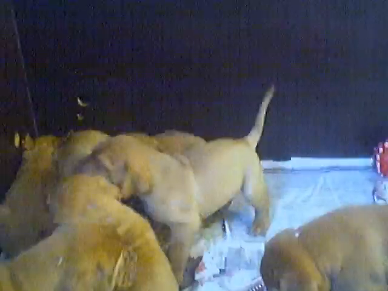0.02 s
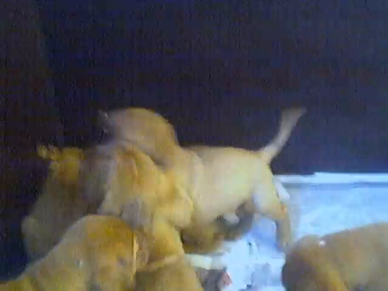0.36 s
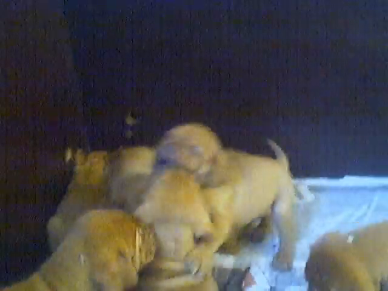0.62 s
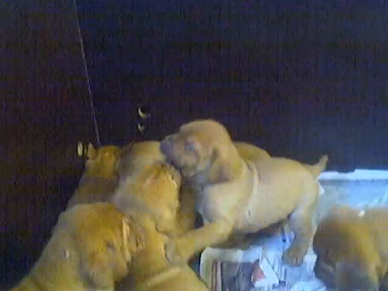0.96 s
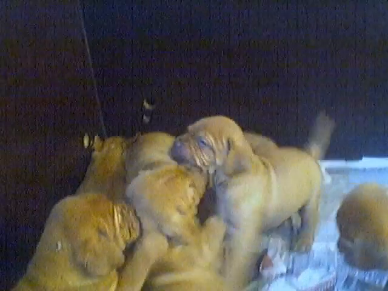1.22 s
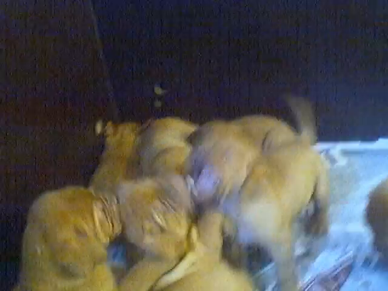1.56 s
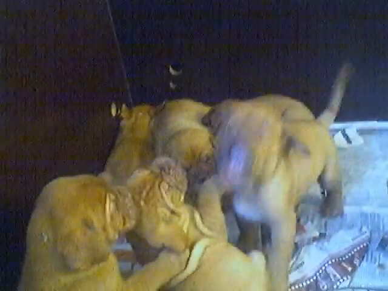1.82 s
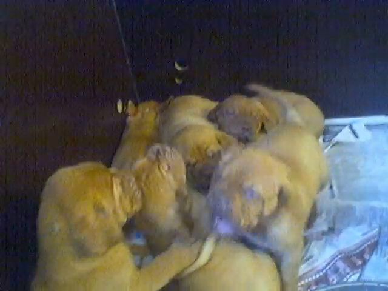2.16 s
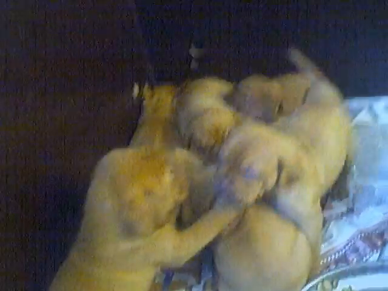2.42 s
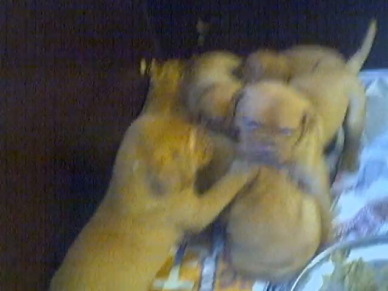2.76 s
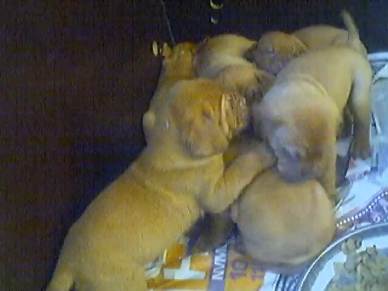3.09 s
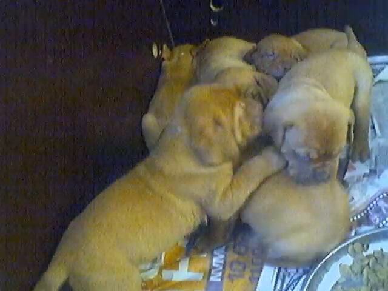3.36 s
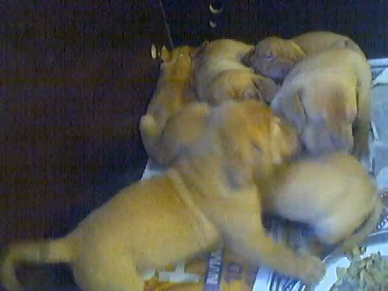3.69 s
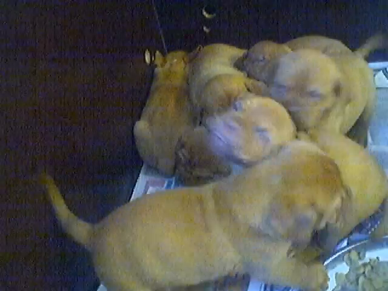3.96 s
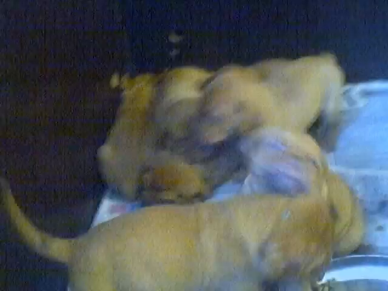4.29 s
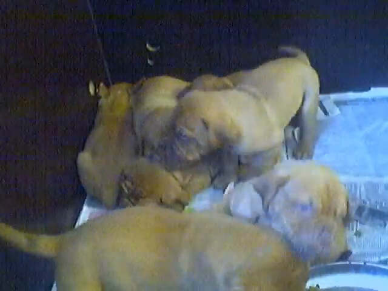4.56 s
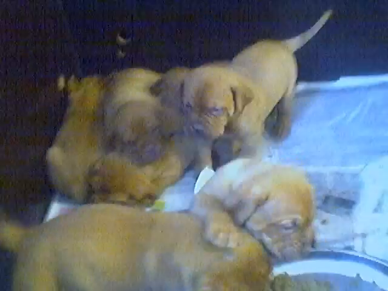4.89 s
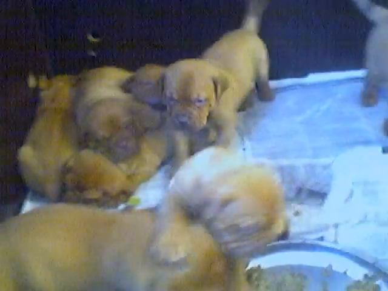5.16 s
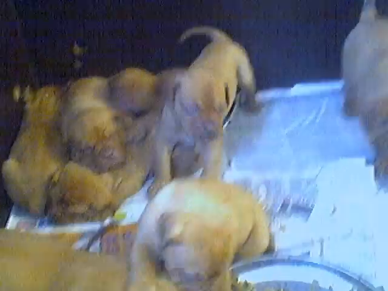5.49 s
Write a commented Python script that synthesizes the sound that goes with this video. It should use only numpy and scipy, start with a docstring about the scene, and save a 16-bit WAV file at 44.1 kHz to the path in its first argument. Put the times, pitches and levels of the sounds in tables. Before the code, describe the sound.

Puppies scuffle on faintly rustling newspaper and clink a metal pan, then one tumbles close by with loud thumps and scraping, over buzzy hum.

```python
"""Newspaper rustles and snaps under the paws of puppies scuffling indoors beside a metal food pan. Claws tick,
kibble cracks sharply between teeth and rings briefly, a paw makes the pan clink, and there are faint grunts. At
the end a pup tumbles close by, thumps the floor and shoves the pan over the paper. A cheap camera picks it all
up with a shrill microphone, mains hum and a coarse, buzzy converter."""
import sys
import numpy as np
from scipy import signal
from scipy.fft import rfft, irfft, next_fast_len
from scipy.io import wavfile

SR = 44100
rng = np.random.default_rng(int(sys.argv[2]) if len(sys.argv) > 2 else 0)


def output_pcm(signal):
    """Save a mono or channel-first signal as 16-bit PCM at the path in sys.argv[1].

    Samples are clipped to [-1, 1] before scaling.
    """
    pcm = np.clip(np.atleast_2d(signal).T, -1, 1) * 32767
    wavfile.write(sys.argv[1], SR, np.round(pcm).astype(np.int16))


N = 247401
TIME = np.arange(N) / SR


def from_db(db):
    """Turn decibels into a number to multiply by."""
    return 10 ** (np.asarray(db) / 20)


def unit_power(x):
    """Scale a signal so that its average power is 1."""
    return x / np.sqrt(np.mean(x ** 2) + 1e-20)


def drift(per_s):
    """A wandering curve that heads for a new random value per_s times a second."""
    points = rng.standard_normal(4000)
    return unit_power(np.interp(TIME * per_s, np.arange(len(points)), points))


def coloured(x, spectrum):
    """Make some pitches louder and others softer, following rows of (Hz, dB)."""
    size = next_fast_len(N + SR // 4, True) // 2 * 2
    hz, db = np.transpose(spectrum)
    grid_hz = np.maximum(np.arange(size // 2 + 1) * SR / size, 1)
    gain = from_db(np.interp(np.log(grid_hz), np.log(hz), db))
    # Minimum phase: the filter rings only after a click, never before it.
    cepstrum = irfft(np.log(gain))
    cepstrum[1:size // 2] *= 2
    cepstrum[size // 2 + 1:] = 0
    return irfft(rfft(x, size) * np.exp(rfft(cepstrum)))[:N]


def resonance(x, hz, width):
    """Let through a band of pitches around hz, with the width also in Hz."""
    r = np.exp(-np.pi * width / SR)
    feedback = [1, -2 * r * np.cos(2 * np.pi * hz / SR), r * r]
    return signal.lfilter(np.array([1, 0, -1]) * (1 - r * r) / 2, feedback, x + 1e-18)


def ring(x, hz, t60):
    """Each click starts a pure tone that fades by 60 dB in t60 seconds."""
    r, w = np.exp(-np.log(1000) / (t60 * SR)), 2 * np.pi * hz / SR
    return signal.lfilter([0, np.sin(w)], [1, -2 * r * np.cos(w), r * r], x + 1e-18)


def grains(per_s, spread_db):
    """Tiny clicks of uneven size at random moments."""
    sizes = from_db(spread_db * np.minimum(rng.exponential(1, N), 4))
    signs = rng.choice([-1, 1], N)
    return unit_power(sizes * signs * (rng.random(N) < per_s / SR))


def sprays(rows, spray_db, fade_s):
    """Each row (start, dB) makes a click, then a fading spray with spray_db more energy than it."""
    out, age = np.zeros(N + SR), TIME[:SR // 8]
    for start, db in rows:
        spray = rng.standard_normal(len(age)) * np.exp(-age / fade_s) * (age > .001)
        spray *= from_db(spray_db) / np.linalg.norm(spray)
        spray[0] += 1   # the click itself
        at = round(start * SR)
        out[at:at + len(age)] += from_db(db) * spray
    return out[:N]


def strokes(rows, rise_s, sag_db_per_s, fade_db_per_s):
    """A loudness curve: each stroke (start, length, dB) rises, sags while it lasts, then fades."""
    power = np.zeros(N)
    for start, length, db in rows:
        age = np.maximum(TIME - start, 0)
        rise = np.minimum(age / rise_s, 1)
        fall_db = sag_db_per_s * np.minimum(age, length) + fade_db_per_s * np.maximum(age - length, 0)
        power += (rise * from_db(db - np.minimum(fall_db, 200))) ** 2
    return np.sqrt(power)


# The tones of the hum. Each row: multiple of the mains frequency, level in dB.
HUM_TONES = [(1, -51), (3, -71.5), (4, -79)]

def electronics(mains_hz=50):
    """The camera adds mains hum, a low flutter of noise and a faint sputtering hiss."""
    phase = 2 * np.pi * mains_hz * (TIME + .001)
    hum = -sum((-1) ** k * from_db(db) * np.sin(multiple * phase)
               for k, (multiple, db) in enumerate(HUM_TONES))
    flutter = from_db(-71) * unit_power(resonance(rng.standard_normal(N), hz=242.6, width=400))
    hiss = from_db(-71.5) * rng.standard_normal(N)
    sputter = from_db(-64) * grains(per_s=140, spread_db=-1)
    return hum + flutter + hiss + sputter


# Faint puppy grunts. Each row: loudest moment in seconds, length in seconds, pitch in Hz, level in dB.
PUPPY_GRUNTS = [(4.69, 0.063, 616, -53), (4.89, 0.14, 474, -59.5), (4.965, 0.08, 616, -60.5)]

def grunts():
    """A hoarse little sound swells and fades, resonating in a closed muzzle."""
    out = np.zeros(N)
    for middle, length, hz, db in PUPPY_GRUNTS:
        swell = np.cos(np.pi * np.clip((TIME - middle) / length, -.5, .5))
        rasp = resonance(grains(per_s=2300, spread_db=3), hz, width=100)
        out += from_db(db) * swell * unit_power(rasp)
    return out


# Claws and kibble tapping. Each row: start in seconds, level in dB.
HARD_TAPS = [(0.0034, -36.5), (0.07, -36.5), (0.0796, -32.5), (0.158, -34.5), (1.508, -39), (2.204, -36.5),
             (2.864, -35.5), (3.0089, -37.5), (3.1758, -38.5), (3.502, -40.5), (3.8601, -26.5),
             (3.917, -36), (3.9504, -26.5), (3.962, -29), (4.1063, -36.5), (5.165, -21), (5.179, -26),
             (5.2526, -25)]

def ticks():
    """Small hard things touch and ring for a few thousandths of a second."""
    taps = sprays(HARD_TAPS, spray_db=-10, fade_s=0.004)
    return from_db(-6.5) * ring(taps, hz=2676, t60=0.0067)


# Kibble cracking between teeth. Each row: start in seconds, pitch in Hz, level in dB.
KIBBLE_CRUNCHES = [(0.0147, 3870, -42), (1.497, 3540, -36), (2.162, 1293, -41), (3.878, 4600, -41.5),
                   (4.173, 5060, -35.5), (4.697, 1460, -36), (5.186, 3800, -30)]

def kibble_crunches():
    """Each crunch of kibble is a quick spray of clicks that rings briefly at its own pitch."""
    return sum(ring(sprays([(start, db)], spray_db=0, fade_s=0.0029), hz, t60=0.0047)
               for start, hz, db in KIBBLE_CRUNCHES)


# The resonances of the floor under the paper. Each row: pitch in Hz, width in Hz, level in dB.
FLOOR_TONES = [(101.5, 23, -9), (160.4, 34, -0.5), (348, 40, 2.5), (581.3, 31, 2.5), (915, 55, 4),
               (1171, 46, -0.5), (1656, 51, -2.5)]

def floor_body(push):
    """A push shakes the floor at several pitches that die away quickly."""
    return sum((-1) ** k * from_db(db) * resonance(push, hz, width)
               for k, (hz, width, db) in enumerate(FLOOR_TONES))


# Paws and bodies landing. Each row: start in seconds, level in dB.
LANDINGS = [(2.349, -45), (3.776, -35), (4.171, -30.5), (4.214, -34.5), (4.266, -28.5), (5.093, -42),
            (5.251, -19), (5.357, -10), (5.514, -10.5)]

def thumps():
    """Soft weights land and make the floor thud."""
    return from_db(17.5) * floor_body(sprays(LANDINGS, spray_db=2, fade_s=0.012))


# The tones of the metal pan. Each row: pitch in Hz, level in dB, seconds to fade by 60 dB.
PAN_TONES = [(2000, -6.5, .08), (2136, -5, .15), (2165, 0.5, 0.22), (2248, -5, 0.14), (2662, -14.5, 0.2),
             (2756, -10.5, .17), (3314, -14, 0.2)]

def pan_body(push):
    """The pan rings at pitches so close together that the sound wavers."""
    return sum(from_db(db) * ring(push, hz, t60) for hz, db, t60 in PAN_TONES)


# Paws knocking the pan. Each row: start in seconds, level in dB.
PAN_KNOCKS = [(2.0143, -33.5), (2.0264, -33.5), (2.0497, -21), (2.0704, -30.5)]

def pan_clinks():
    """A knock rings the pan; the kibble in it jumps and rattles back down."""
    knocks = sprays(PAN_KNOCKS, spray_db=-16, fade_s=0.0027)
    kibble = sprays(PAN_KNOCKS, spray_db=14, fade_s=0.016)
    hollow = resonance(resonance(kibble, hz=2080, width=560), hz=2080, width=560)
    rattle = hollow + from_db(-1.5) * resonance(kibble, hz=1260, width=630)
    sparkle = resonance(kibble, hz=8800, width=2300)
    return from_db(-19) * pan_body(knocks) + from_db(2.6) * rattle + from_db(-5.5) * sparkle


# The faint rustle of restless puppies between paw strokes. Each row: time in seconds, level in dB.
FIDGETING = [(0, -58.5), (0.25, -63), (0.52, -67), (0.65, -59.5), (0.95, -60.5), (1.24, -67.5),
             (1.33, -58.5), (2.25, -56.5), (2.36, -61.5), (2.66, -63.5), (2.9, -52), (3.08, -67.5),
             (3.3, -56), (3.68, -61), (4.05, -52.5), (4.7, -51.5), (5.03, -62)]
# Paws sliding over the paper. Each row: start in seconds, length in seconds, level in dB.
PAW_SLIDES = [(0.0, 0.018, -48.5), (0.064, 0.02, -43), (0.11, 0.04, -54.5), (0.33, 0.025, -54.5),
              (0.765, 0.037, -54.5), (1.03, 0.023, -50.5), (1.18, 0.0052, -55), (1.486, 0.05, -45),
              (1.56, 0.16, -50), (1.68, 0.15, -49), (1.85, 0.075, -57.5), (1.978, .02, -50.5),
              (2.73, 0.072, -54.5), (2.797, 0.019, -45), (2.854, 0.046, -45.5), (3.108, 0.017, -46.5),
              (3.17, 0.055, -50.5), (3.38, 0.19, -52.5), (3.722, .015, -51.5), (3.778, 0.022, -50),
              (3.902, .11, -47), (4.102, 0.019, -47.5), (4.167, 0.034, -46), (4.213, 0.12, -41.5),
              (4.34, 0.13, -48.5), (4.465, 0.044, -43), (4.55, .14, -48), (4.835, 0.051, -54.5)]
# Creases snapping. Each row: start in seconds, level in dB.
CREASE_SNAPS = [(0.0153, -31.5), (1.034, -38), (1.4936, -32.5), (1.526, -33), (2.1624, -30), (2.541, -34),
                (3.2035, -28.5), (4.217, -26), (4.2355, -36), (4.263, -24.5), (4.484, -29.5), (5.095, -35),
                (5.111, -26), (5.2533, -30)]
# The tone colour of rustling paper. Each row: frequency in Hz, boost or cut in dB.
RUSTLE_COLOUR = [(100, -6.5), (300, 1), (700, -2), (1200, 1.5), (1900, 1.5), (3000, -1.5), (3800, -5.5),
                 (5000, -9.5), (6500, -10.5), (9200, -5.5), (11000, -11.5)]

def newspaper():
    """Paper fibres crackle in clumps as paws slide; now and then a crease snaps."""
    fidgets = from_db(np.interp(TIME, *np.transpose(FIDGETING)))
    slides = from_db(0.06) * strokes(PAW_SLIDES, rise_s=0.005, sag_db_per_s=15, fade_db_per_s=420)
    fibres = grains(per_s=8000, spread_db=2)
    clumps = from_db(1.9 * drift(per_s=80) + 0.23)
    crackle = np.hypot(slides, fidgets) * fibres * clumps
    snaps = from_db(9) * sprays(CREASE_SNAPS, spray_db=-2, fade_s=0.005)
    return coloured(crackle + snaps, RUSTLE_COLOUR)


# The tumbling pup shoves pan and paper.
# Each row: start in seconds, length in seconds, scraping level in dB, push on the floor in dB.
PUP_SHOVES = [(5.088, 0.18, -42.5, -42.5), (5.112, 0.12, -34.5, -51), (5.163, 0.023, -34, -60),
              (5.247, 0.035, -30.5, -28), (5.297, 0.052, -25, -26.5), (5.35, 0.048, -23.5, -33.5),
              (5.418, 0.17, -30.5, -34), (5.514, 0.03, -31.5, -40)]
# The tone colour of scraped paper. Each row: frequency in Hz, boost or cut in dB.
SCRAPE_COLOUR = [(80, -11), (200, -1), (600, -2), (1200, 7.5), (2000, 5.5), (3000, -0.5), (4200, -8),
                 (6500, -17), (9200, -7), (11000, -23.5)]

def tumble():
    """The shoved pan sticks and slips: paper scrapes, the metal sings faintly and the floor rumbles."""
    shape = dict(rise_s=0.0061, sag_db_per_s=21, fade_db_per_s=230)
    scraping = strokes([(start, length, db) for start, length, db, _ in PUP_SHOVES], **shape)
    weight = strokes([(start, length, db) for start, length, _, db in PUP_SHOVES], **shape)
    slips = from_db(0.91 * drift(per_s=130))
    friction = scraping * slips * grains(per_s=14000, spread_db=1.7)
    rumble = from_db(13) * floor_body(weight * slips * grains(per_s=4000, spread_db=0.1))
    # The pan's rim catches on the paper; the catches grow louder faster than the scraping does.
    grip = scraping.max() * (scraping / scraping.max()) ** 2.4
    catches = from_db(-22.5) * ring(grip * grains(per_s=130, spread_db=-2.1), hz=2750, t60=0.006)
    singing = from_db(-48.5) * pan_body(friction)
    return coloured(friction, SCRAPE_COLOUR) + catches + singing + rumble


def room(x, t60, echo_db):
    """The walls of the pen add a short blur of echoes."""
    age = TIME[:SR // 2]
    tail = rng.standard_normal(len(age)) * np.exp(-np.log(1000) * age / t60) * (age > .003)
    return x + from_db(echo_db) * signal.fftconvolve(x, tail / np.linalg.norm(tail))[:N]


def scene():
    """All the sounds in the pen, mixed into one channel."""
    mix = newspaper() + ticks() + kibble_crunches() + tumble() + thumps() + pan_clinks() + grunts()
    return room(mix, t60=0.24, echo_db=-12.5)[None]


def microphone(x, ceiling=0.5):
    """The small microphone boosts one shrill band and rounds off the loudest peaks."""
    shrill = x + from_db(16) * resonance(x, hz=2703, width=370)
    return ceiling * np.tanh(shrill / ceiling)


def converter(x, step=0.0055, cutoff_hz=12200):
    """Round down to coarse steps at half the sample rate; in the quiet, hum flips a step and buzzes."""
    stepped = step * np.floor(signal.resample_poly(x, 1, 2) / step)
    smoothing = signal.firwin(45, 11000, fs=SR)
    full_rate = signal.resample_poly(stepped, 2, 1, window=smoothing)[:N]
    treble_cut = signal.ellip(10, .1, 80, cutoff_hz, fs=SR, output="sos")
    return signal.sosfilt(treble_cut, full_rate)


def record(dry):
    """The sound passes through the camera's microphone, gains hum and hiss, and meets the converter."""
    return converter(microphone(dry[0]) + electronics())[None]


dry = scene()
out = record(dry)
output_pcm(out)
```